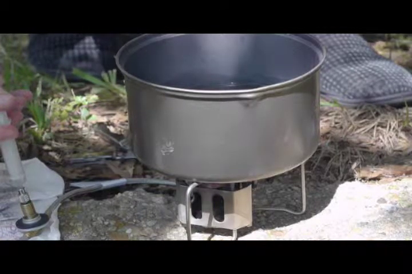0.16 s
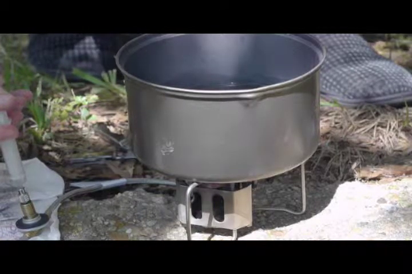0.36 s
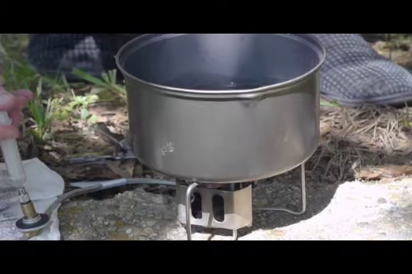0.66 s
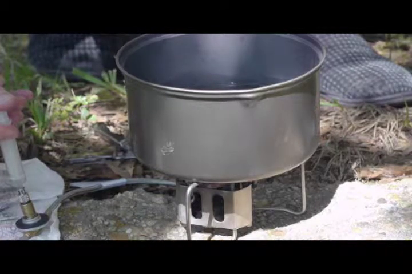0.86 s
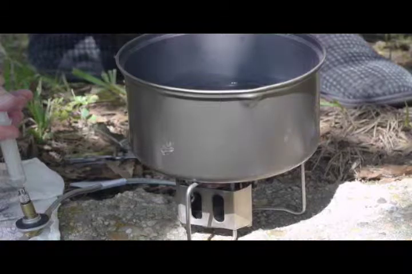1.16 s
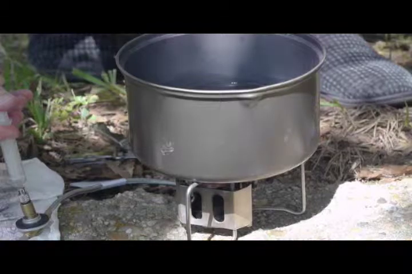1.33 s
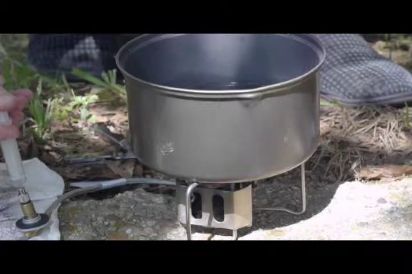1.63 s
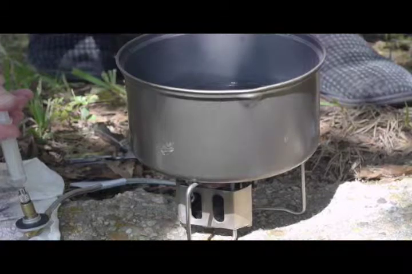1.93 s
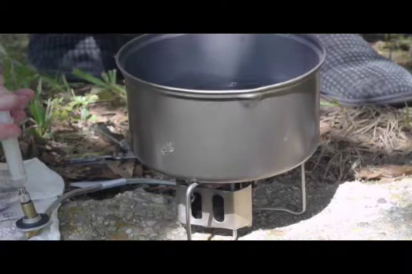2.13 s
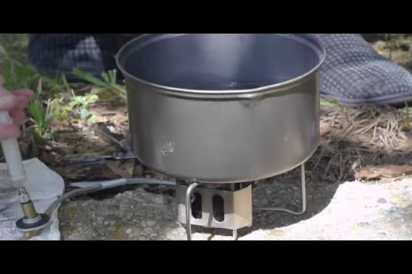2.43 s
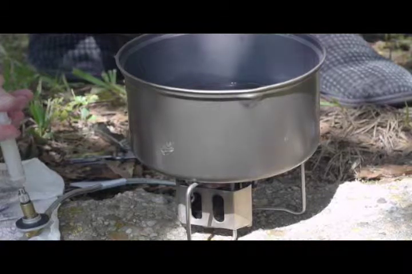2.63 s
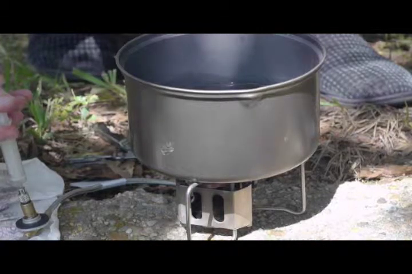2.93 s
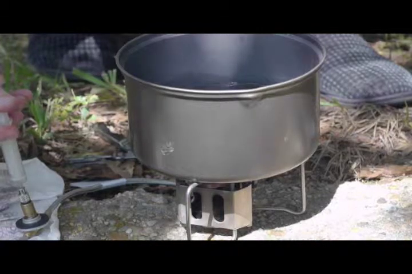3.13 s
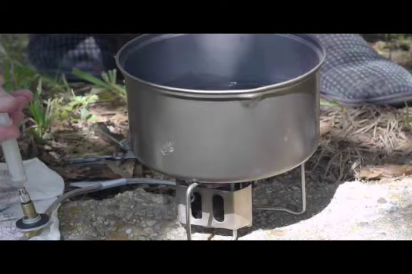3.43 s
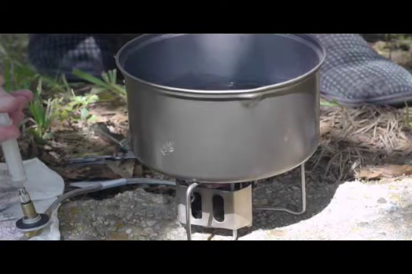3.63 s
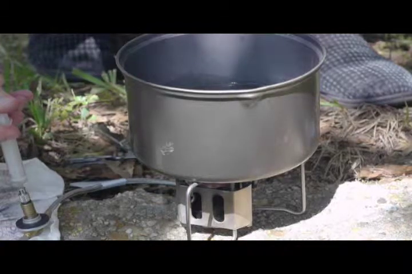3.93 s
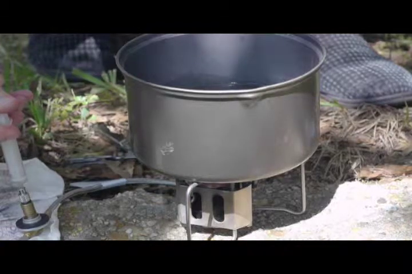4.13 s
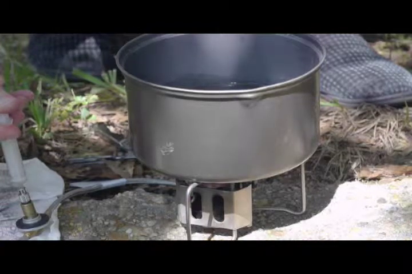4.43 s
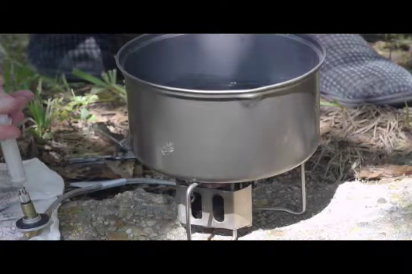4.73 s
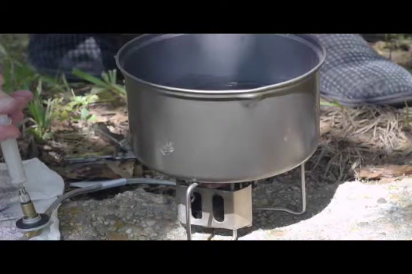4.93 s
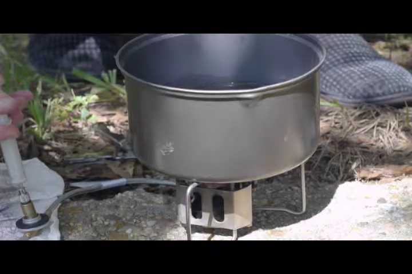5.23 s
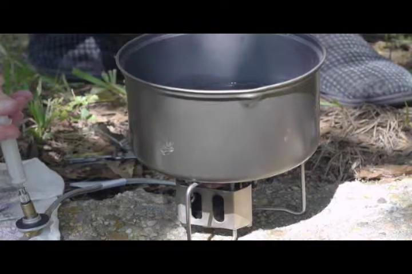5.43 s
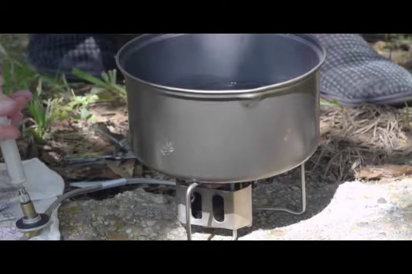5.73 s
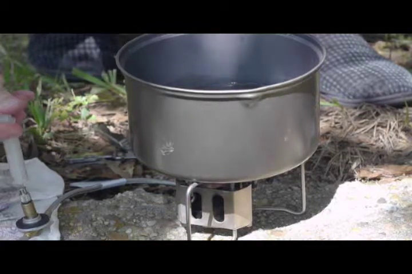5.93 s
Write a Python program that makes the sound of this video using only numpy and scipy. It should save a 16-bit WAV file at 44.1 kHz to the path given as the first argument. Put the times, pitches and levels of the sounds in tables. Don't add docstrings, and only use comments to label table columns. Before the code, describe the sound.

Close up outdoors, a camping burner rushes continuously, its roar coloured by the hollow gap beneath a pot, with tiny surges, dips and muffled pops. A bird whistles very faintly on the left at moments. The flame chokes off abruptly near the end, leaving only quiet traffic wash, leaves and a distant low engine drone. The stereo pickup has limited treble.

```python
import sys
import numpy as np
from scipy import signal
from scipy.fft import rfft, irfft
from scipy.io import wavfile
from scipy.ndimage import uniform_filter1d

SR = 44100
rng = np.random.default_rng(int(sys.argv[2]) if len(sys.argv) > 2 else 0)


def volts(x):
    e = np.asarray(x, float) / 20
    return 10 ** e


def int16_out(signal):
    q = np.round(np.clip(np.atleast_2d(signal).T, -1, 1) * 32767)
    wavfile.write(sys.argv[1], SR, q.astype(np.int16))


N = 268260
TIME = np.arange(N) / SR
HZ = np.fft.rfftfreq(4096, 1 / SR)

# [f/Hz, width/Hz, level/dB]
GAP = [(99, 14, -8), (250, 65, -1.5), (432, 123, 2.5), (709, 110, 2.5), (857, 64, -3), (1042, 150, 2),
       (1188, 90, -3.5), (1417, 90, 2), (1470, 110, -2.5), (2150, 140, -5), (2326, 240, 6), (2338, 120, 1),
       (2586, 310, 3.5), (2843, 150, -1.5), (3590, 250, 5), (3800, 65, 6.5), (4040, 150, -0.5),
       (5500, 270, 0.5)]
# [t/s, length/s, level/dB]
FEED_SURGES = [(0, 0.016, 4), (.08, .06, -2), (.3, 0.027, 0.5), (.83, .02, 1), (.87, 0.021, -6),
               (1.33, .015, -0.5), (1.35, .015, 2.5), (2.22, 0.041, -4), (2.39, .03, 1), (2.83, 0.027, 1.5),
               (3.72, .04, -2), (4.18, 0.017, 1), (4.33, 0.043, -1.5), (4.36, 0.087, 1.5),
               (4.46, 0.033, -2.5), (4.96, 0.042, 2), (5.24, .04, 2), (5.33, 0.023, -3.5),
               (5.445, 0.018, -2.5), (5.49, 0.022, 1)]


def stove():
    # [f/Hz, level/dB]
    lean = [(800, -.05), (1150, -.9), (1450, -.2), (1800, -1.6), (2050, -.8), (2230, -3.7), (2500, -2.1),
            (2680, .6), (2830, -1.7), (3100, 1.5), (3400, 1.9), (4000, -.2), (5600, .5), (6400, 3.1)]
    flutter = flicker(top_hz=60.5)
    flame = burner_roar(flutter) + jet_hiss(flutter)
    lean_db = read(lean, HZ)
    direct = np.array([colour(flame, lean_db / 2), colour(flame, -lean_db / 2)])
    return direct + surroundings(flame)


def burner_roar(flutter):
    # [f/Hz, level/dB per Hz]
    roar_spectrum = [(45, -60.5), (105, -23), (200, -8.5), (320, -6), (500, -2.5), (800, -5), (1250, -12.5),
                     (2000, -22), (3500, -52.5), (8000, -80.5)]
    # [t/s, peak level/dB]
    lone_pops = [
        (0.918, -17),
        (1.345, -16.5),
        (1.907, -15),
        (2.936, -13),
        (3.39, -18.5),
        (4.063, -17),
    ]
    pops = np.zeros(N)
    for start, db in lone_pops:
        pops[round((start + 0.001) * SR)] = volts(db + 43.5)
    burning = puffs(per_s=900, spread_db=3.0, share=0.23)
    burning *= volts(0.3 * flutter + 0.5 * flicker(top_hz=40))
    ringing = colour(burning + pops, read(roar_spectrum, HZ) + gap_response())
    level_db = -22 + swells(FEED_SURGES) + dying(start=5.525, db_per_s=520)
    return evened(ringing) * volts(level_db)


def jet_hiss(flutter):
    # [f/Hz, level/dB per Hz]
    hiss_spectrum = [(300, -35), (1000, 5), (1800, -0.5), (2800, -4), (4000, -11), (5000, -16.5),
                     (6500, -18), (8000, -26)]
    # [t/s, length/s, level/dB]
    jet_surges = [
        (.08, 0.064, 1),
        (1.12, 0.21, 1.5),
        (2.22, .06, 0.5),
        (3.98, .1, 1.5),
        (4.7, 0.14, 1.5),
        (5.24, .08, 2),
        (5.42, 0.14, 2.5),
    ]
    jet = puffs(per_s=3000, spread_db=1.5, share=0.57)
    jet *= volts(0.33 * flutter + 0.66 * flicker(top_hz=91))
    ringing = colour(jet, read(hiss_spectrum, HZ) + gap_response())
    feed_share = 0.27
    level_db = -33.5 + feed_share * swells(FEED_SURGES) + swells(jet_surges)
    return evened(ringing) * volts(level_db + dying(start=5.52, db_per_s=480))


def puffs(per_s, spread_db, share):
    fires = rng.random(N) < per_s / SR
    size = fires * volts(spread_db * np.minimum(rng.exponential(1, N), 4))
    kicks = evened(size - size.mean())
    return np.sqrt(share) * kicks + np.sqrt(1 - share) * rng.standard_normal(N)


def gap_response():
    return sum(db * np.exp(-0.5 * (1.71 * (HZ - hz) / width) ** 2) for hz, width, db in GAP)


def dying(start, db_per_s):
    knee_s = 0.013
    return -db_per_s * knee_s * np.logaddexp(0, (TIME - start) / knee_s)


def surroundings(flame):
    # [delay/s, left share, right share]
    echoes = [(.0047, .06, 0.11), (0.0106, .14, 0.044), (0.0111, 0.13, 0.17), (.0125, 0.14, 0.037),
              (0.0145, 0.18, 0.041), (0.0173, 0.072, .09)]
    treble = signal.sosfilt(signal.butter(4, 4100, "high", fs=SR, output="sos"), flame)
    scatter = signal.fftconvolve(treble[None], diffuse(t60=0.06, start=0.0039), axes=1)[:, :N]
    out = volts(-14) * scatter
    for delay_s, left, right in echoes:
        delay = round(delay_s * SR)
        out[:, delay:] += np.outer([left, right], treble[:N - delay])
    return out


def bird():
    # [t/s, length/s, top f/Hz, fall/Hz, level/dB]
    whistles = [
        (0, 0.11, 6950, 300, -46.5),
        (2.39, 0.13, 7280, 260, -46),
        (2.506, .075, 7170, 684, -44),
        (4.6, .035, 7630, 50, -46),
        (4.745, .125, 7400, 330, -47),
    ]
    song, tremble = np.zeros(N), flicker(top_hz=150)
    for start, length, top_hz, fall_hz, db in whistles:
        part = np.clip((TIME - start) / length, 0, 1)
        rise, fade = np.minimum(part / 0.18, 1), np.minimum((1 - part) / 0.22, 1)
        scoop = 1 - 0.028 * np.exp(-part / 0.11)
        pitch = top_hz * scoop - fall_hz * part ** 1.6
        turns = np.cumsum(pitch * (1 + 0.008 * flicker(top_hz=120))) / SR
        level_db = db - 0.5 * (2 - part) + 3.2 * tremble
        song += rise * fade * volts(level_db) * np.sin(2 * np.pi * turns)
    late = np.concatenate([np.zeros(2), song[:-2]])
    trees = signal.fftconvolve(song[None], diffuse(t60=0.5, start=0.0067), axes=1)[:, :N]
    return volts(7.0) * np.array([song, volts(-8) * late]) + volts(-3) * trees


def engine():
    # [t/s, length/s, level/dB]
    lower_swells = [
        (.6, .6, 4),
        (2.2, 0.68, 2),
        (3.147, 0.36, 8),
        (3.5, .45, 9),
        (4.203, .3, 11.5),
        (4.5, 0.24, 5.5),
        (4.903, .4, 9),
    ]
    # [t/s, length/s, level/dB]
    upper_swells = [
        (1.6, 0.46, 6.5),
        (3.05, 1, 9),
        (4.2, .35, 10.8),
        (4.65, 0.48, 10),
        (5.1, 0.33, 5),
        (5.6, 0.31, 9),
        (5.95, 0.26, 8.5),
    ]
    lower = hum(0.97, -55.5, lower_swells)
    return lower + hum(1.59, -51, upper_swells)


def hum(ratio, level_db, rows):
    # [t/s, f/Hz]
    engine_pitch = [(0, 80), (1, 76.3), (2.4, 77.5), (3.0, 82.5), (3.9, 82.5), (4.1, 84), (4.6, 82),
                    (5, 78.5), (5.5, 82), (6.1, 82)]
    pitch = ratio * np.interp(TIME, *np.transpose(engine_pitch)) * (1 + 0.0059 * flicker(top_hz=5.5))
    level = volts(level_db + swells(rows) + 0.8 * flicker(top_hz=12))
    return np.sqrt(2) * level * np.sin(2 * np.pi * np.cumsum(pitch) / SR)


def yard():
    # [f/Hz, level/dB per Hz]
    yard_spectrum = [(25, -48.5), (40, -21), (62, -7), (99, -17), (130, -9.5), (200, -12), (300, -17),
                     (450, -28), (600, -26), (1130, -26), (1800, -31.5), (2600, -41), (4500, -45.5),
                     (6800, -48.5), (7600, -35.5)]
    # [f/Hz, left-right likeness]
    likeness = [(40, 0.95), (300, 1), (600, 1), (1040, 0.88), (1800, 0.32), (3000, 0.99), (7000, 0)]
    frames, hz = N // 256 + 5, np.fft.rfftfreq(1024, 1 / SR)
    a, b, c, d, patches = rng.standard_normal((5, len(hz), frames))
    patches = uniform_filter1d(patches, size=10, axis=0)
    patches = evened(uniform_filter1d(patches, size=16, axis=1))
    same = np.clip(read(likeness, hz), -1, 1)[:, None]
    left = a + 1j * b
    right = same * left + np.sqrt(1 - same ** 2) * (c + 1j * d)
    spectra = np.array([left, right]) * volts(read(yard_spectrum, hz)[:, None] + 0.9 * patches)
    wash = signal.istft(spectra, nperseg=1024, noverlap=768)[1][:, :N]
    return volts(-39.5) * evened(wash)


def swells(rows):
    return sum(db * np.exp(-0.5 * (2.355 * (TIME - s) / length) ** 2) for s, length, db in rows)


def flicker(top_hz):
    hz = np.fft.rfftfreq(N, 1 / SR)
    shape = hz / (hz + 9) / np.sqrt(hz + 6) / (1 + (hz / top_hz) ** 2)
    return evened(irfft(rfft(rng.standard_normal(N)) * shape, N))


def diffuse(t60, start):
    t = np.arange(SR // 2) / SR
    tails = rng.standard_normal((2, len(t))) * volts(-60 * t / t60) * (t > start)
    return tails / np.linalg.norm(tails[0])


def colour(x, gain_db):
    log_gain = np.maximum(gain_db, -110) * np.log(10) / 20
    circle = np.concatenate([log_gain, log_gain[-2:0:-1]])
    taps = np.fft.ifft(np.exp(np.conj(signal.hilbert(circle)))).real
    return signal.oaconvolve(x, taps[:len(HZ)])[:N]


def read(points, hz):
    f, value = np.transpose(points)
    return np.interp(np.log(hz + 1), np.log(f + 1), value)


def evened(x):
    return x / np.sqrt(np.mean(x ** 2) + 1e-20)


def scene():
    return stove() + bird() + engine() + yard()


def top_cut(x):
    return signal.sosfilt(signal.butter(12, 15740, fs=SR, output="sos"), x)


def record(dry):
    # [f/Hz, level/dB]
    band_limit = [(24, -12.5), (33, -6.5), (43, 1), (6800, -2), (7100, -6.5), (7350, -13), (7560, -23.5),
                  (7620, -34), (7720, -51), (7800, -74)]
    # [f/Hz, level/dB]
    converter = [(8000, -140), (10300, -104), (11300, -85), (16000, -90)]
    left = signal.sosfilt(signal.butter(1, 48, "high", fs=SR, output="sos"), dry[0])
    limited = np.array([colour(side, read(band_limit, HZ)) for side in (left, dry[1])])
    noise = np.array([colour(side, read(converter, HZ)) for side in rng.standard_normal(dry.shape)])
    return top_cut(limited + noise)


dry = scene()
out = record(dry)
int16_out(out)
```